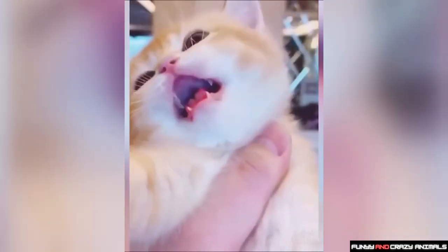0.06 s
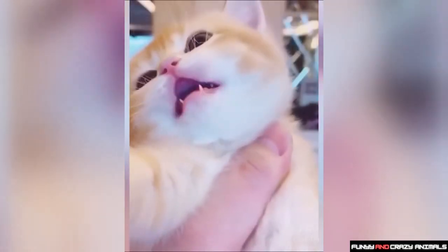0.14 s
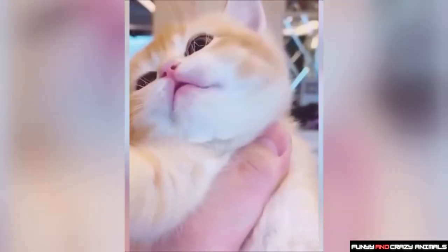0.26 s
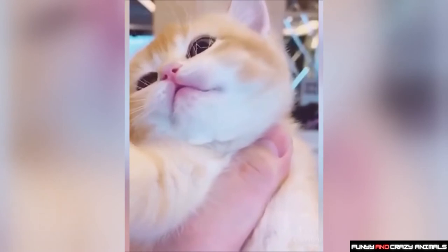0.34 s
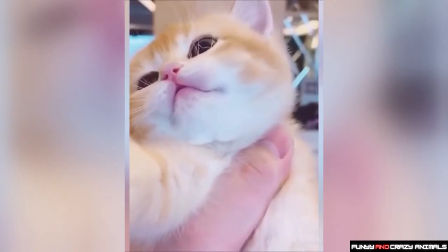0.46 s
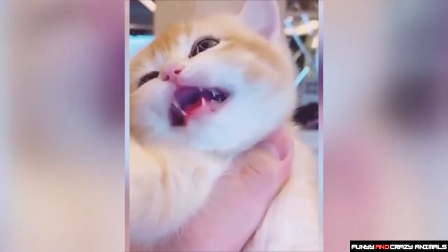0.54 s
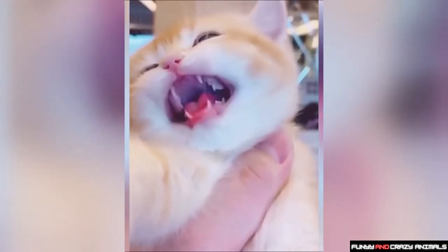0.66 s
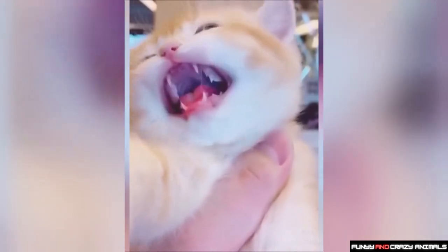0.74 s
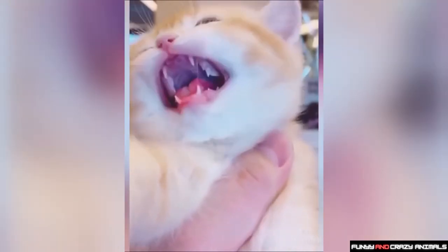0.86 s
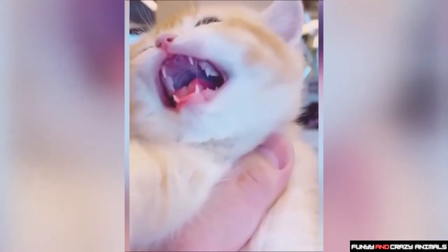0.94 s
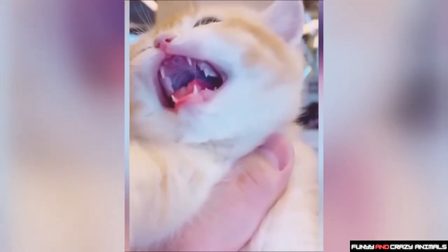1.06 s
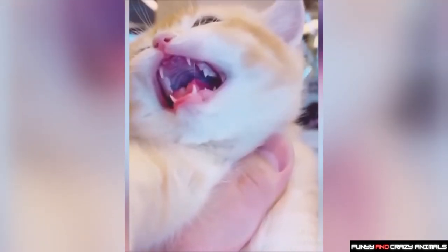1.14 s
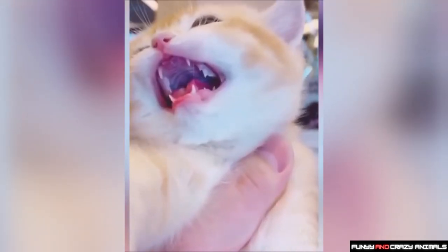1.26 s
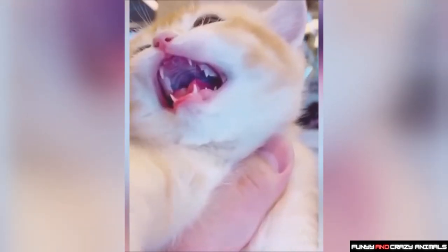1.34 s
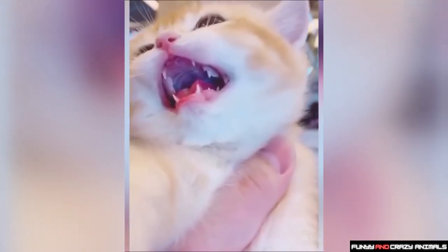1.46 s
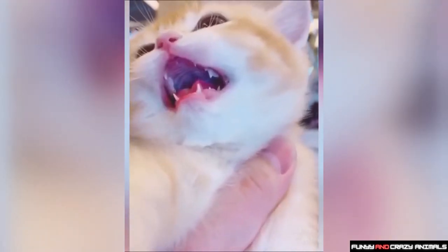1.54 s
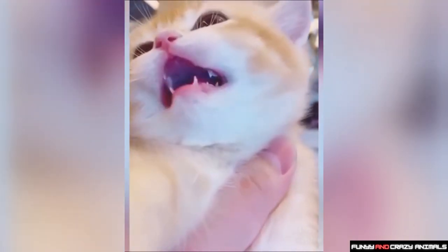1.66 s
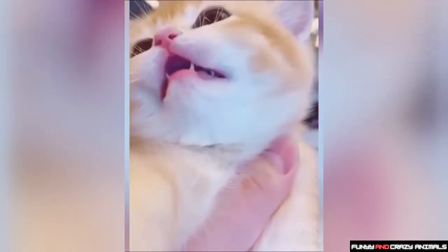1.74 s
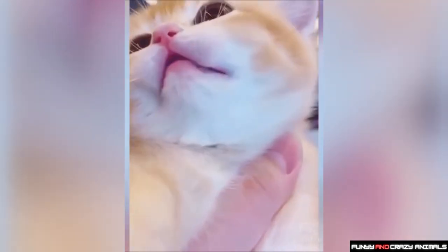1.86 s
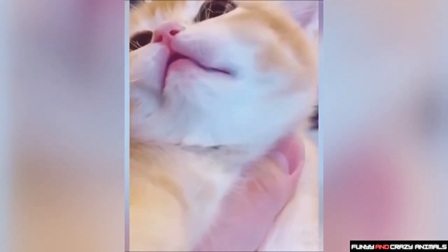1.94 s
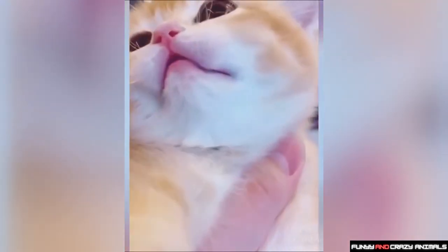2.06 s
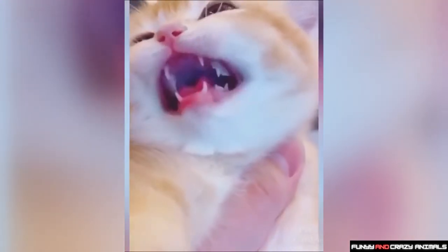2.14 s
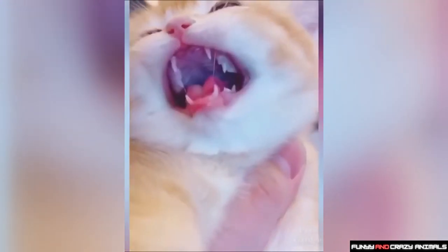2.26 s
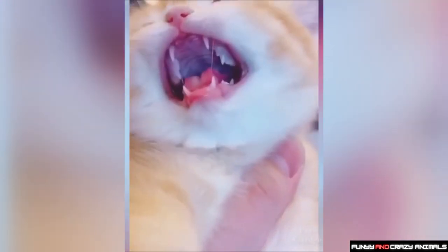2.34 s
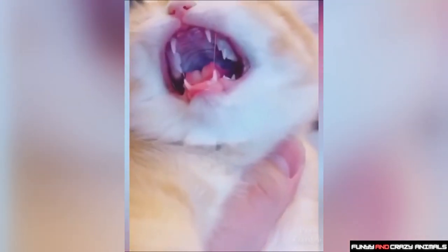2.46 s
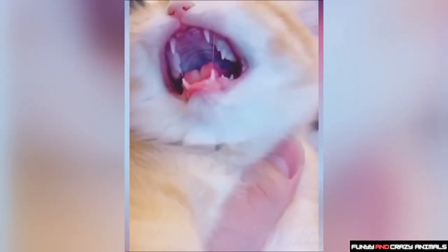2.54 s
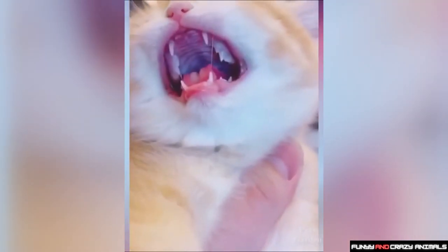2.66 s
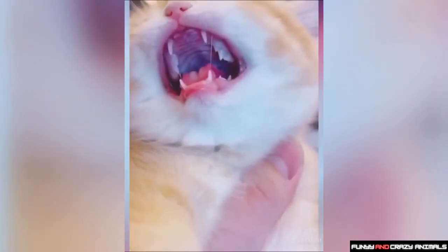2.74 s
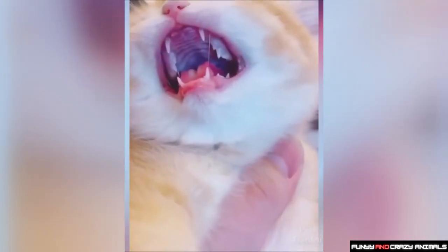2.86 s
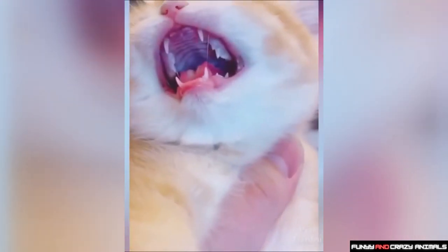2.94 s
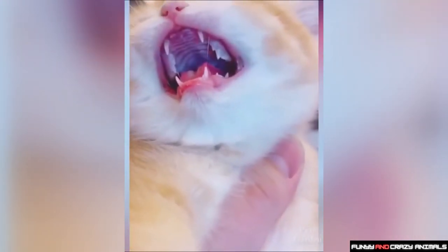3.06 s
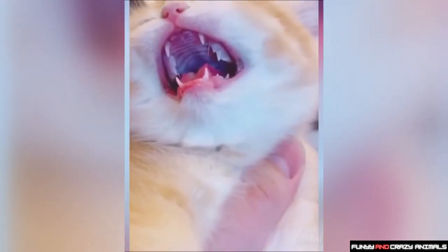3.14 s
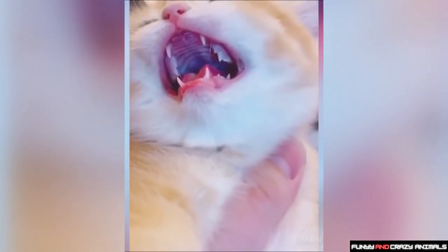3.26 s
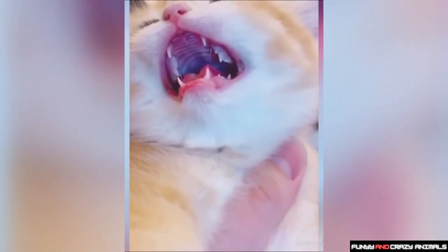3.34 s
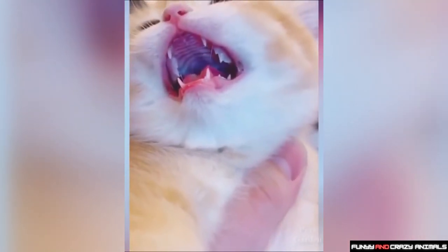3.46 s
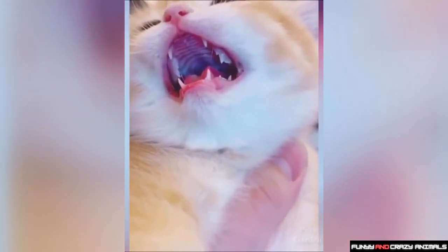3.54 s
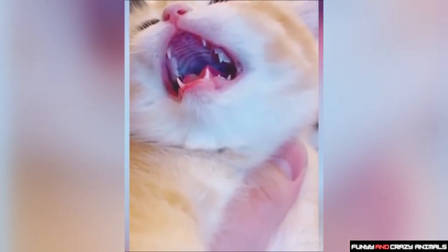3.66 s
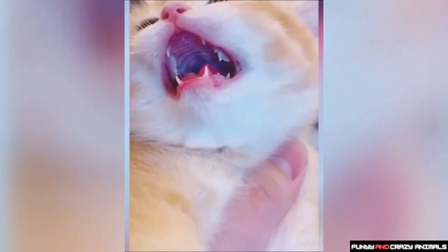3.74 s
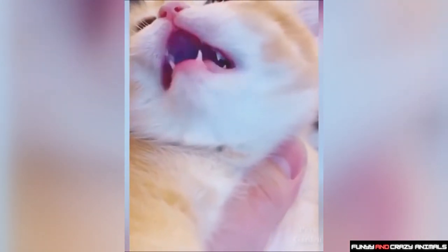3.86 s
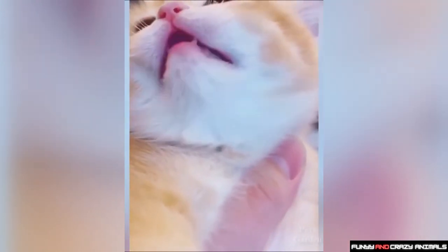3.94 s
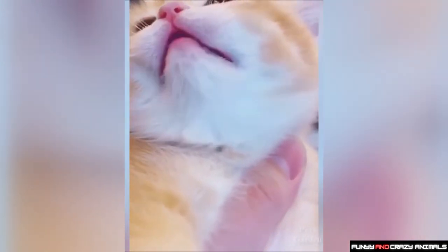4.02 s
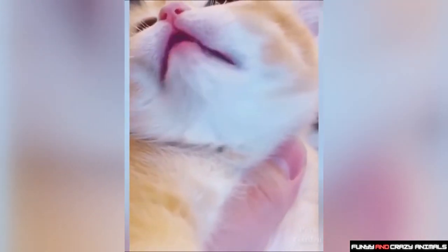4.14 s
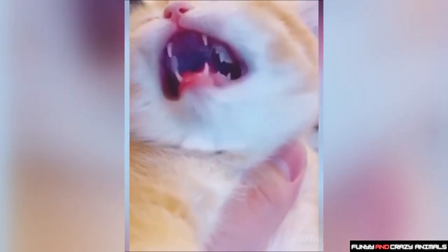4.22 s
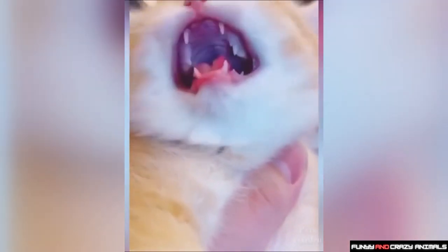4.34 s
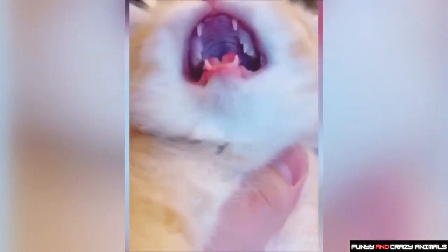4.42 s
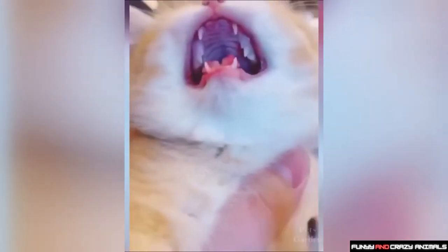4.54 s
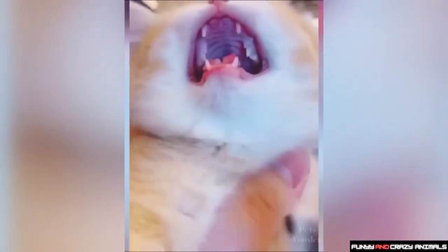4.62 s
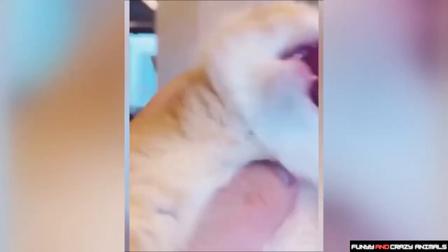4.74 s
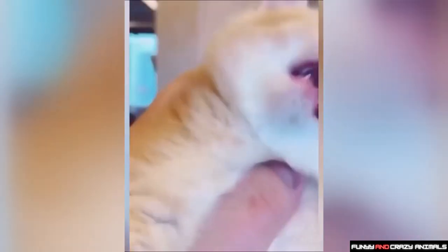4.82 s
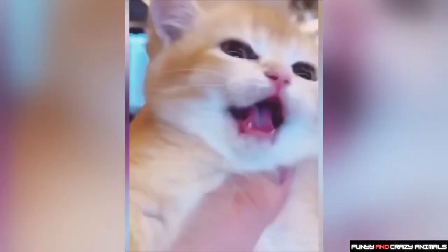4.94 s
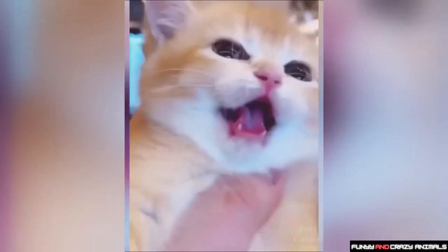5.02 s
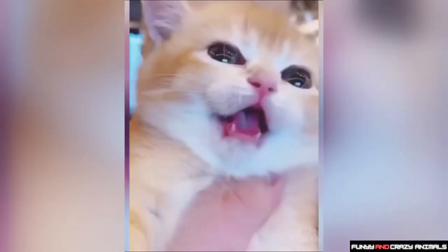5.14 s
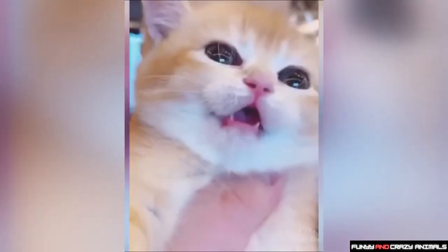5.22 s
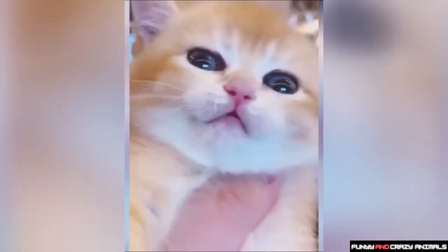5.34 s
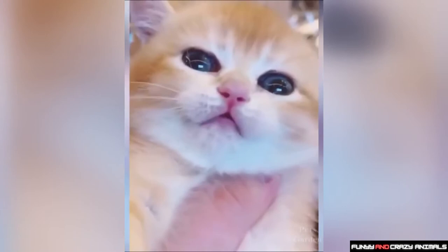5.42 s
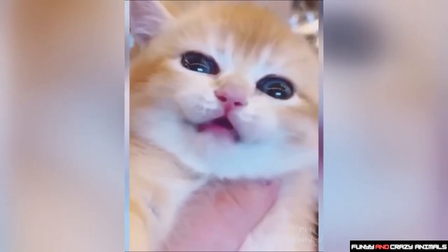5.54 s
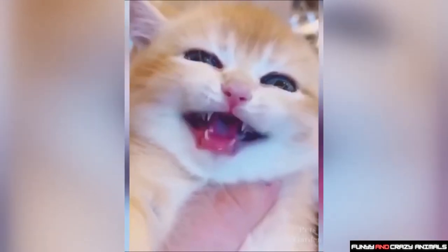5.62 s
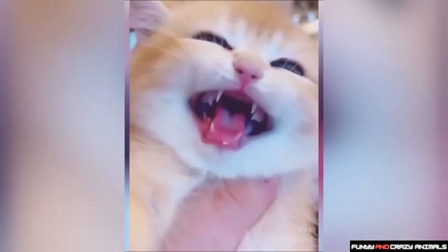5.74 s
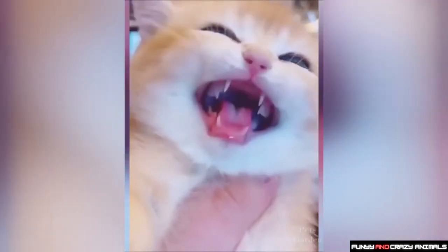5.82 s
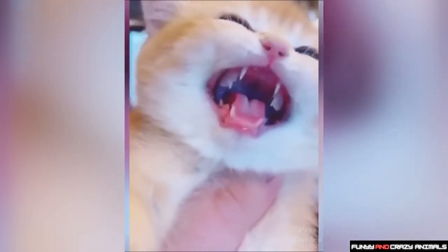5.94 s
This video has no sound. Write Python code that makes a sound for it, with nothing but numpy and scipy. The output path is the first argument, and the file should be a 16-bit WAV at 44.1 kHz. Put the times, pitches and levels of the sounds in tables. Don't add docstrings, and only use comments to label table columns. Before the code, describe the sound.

A kitten meows right at a phone microphone in a small furnished room. The dying end of a call is heard at 0 seconds and shuts with a small pop. After a quiet gap with faint lip parting, a bright, high meow runs from about 0.5 to 1.65, sinking in pitch and ending in a weaker warble and short creak. A light nose puff leads into a long meow from 2.1 to 3.7, hoarse at first, then steady and piercing, slowly falling and closing with a clear pop. After a lip tick, a scream starts around 4.15, rough and doubled, loudest near 4.4 to 4.65 with overloaded grit, then turns into a wavering, duller wail ending with a pop at 5.1. A last breathy, hoarse meow begins softly near 5.5, swells from 5.7 and continues to the end. Faint low rumble and slight hiss lie underneath, with short weak echoes.

```python
import sys
import numpy as np
from scipy import signal
from scipy.io import wavfile
from scipy.ndimage import uniform_filter1d, minimum_filter1d

SR = 44100
rng = np.random.default_rng(int(sys.argv[2]) if len(sys.argv) > 2 else 0)


def store_pcm(level_fs):
    pcm = np.round(np.clip(level_fs, -1, 1) * 32767).astype(np.int16)
    wavfile.write(sys.argv[1], SR, np.atleast_2d(pcm).T)


def invert_db(level):
    return 10 ** (np.asarray(level, dtype=float) / 20)


N = 263718
LEAD = 13230


def evened(x):
    return x / np.sqrt(np.mean(abs(x) ** 2) + 1e-20)


def read(points, hz):
    f, value = np.transpose(points)
    return np.interp(np.log(hz + 1), np.log(f + 1), value)


def along(rows, t):
    s, *columns = np.transpose(rows)
    return [np.interp(t, s, c) for c in columns]


def drift(length, span):
    chance = uniform_filter1d(rng.standard_normal(length), int(span))
    return evened(uniform_filter1d(chance, int(span)))


def patches(rows, t, rest_db, edge_db_per_s):
    start, end, db = np.transpose(rows)[:, :, None]
    outside_s = np.maximum(np.maximum(start - t, t - end), 0)
    return np.maximum((db - edge_db_per_s * outside_s).max(axis=0), rest_db)


# freq_hz, density_db [dB per Hz]
RUMBLE_SPECTRUM = [(25, -11.5), (55, 2.5), (110, -7.5), (190, -9.5), (300, -20), (500, -25), (1000, -34),
                   (3000, -36.5), (7000, -44), (15000, -63.5)]
# start_s, end_s, level_db
RUMBLE_SWELLS = [(.1, .15, -52), (.51, 6, -49), (1.45, 1.58, -45), (4.55, 4.66, -41), (5.1, 5.25, -46)]


def rumble(patchy_db=1.5, side_db=-18):
    frames, hz = N // 256 + 5, np.fft.rfftfreq(1024, 1 / SR)
    a, b, c, d, lumps = rng.standard_normal((frames, 513, 5)).T
    lumps = evened(uniform_filter1d(uniform_filter1d(lumps, size=6, axis=0), size=10, axis=1))
    mid, side = a + 1j * b, invert_db(side_db) * (c + 1j * d)
    z = np.array([mid + side, mid - side])
    z = z * invert_db(read(RUMBLE_SPECTRUM, hz)[:, None] + patchy_db * lumps)
    air = evened(signal.istft(z, nperseg=1024, noverlap=768)[1][:, :N])
    level_db = patches(RUMBLE_SWELLS, np.arange(N) / SR, -62, 90) - 3.5
    return invert_db(level_db) * air


# time_s, effort_db, pitch_hz
EARLIER = [(-.3, -1, 814.2), (-.04, -7, 775.5)]
# time_s, pitch_hz
PITCH = [
    [(0.0, 730), (0.038, 648), (0.06, 643.4)],
    [(0.535, 867), (0.567, 880), (0.587, 834), (0.643, 795), (0.661, 752.7), (0.781, 762.3), (0.949, 734.6),
     (1.168, 685), (1.338, 680)],
    [(1.356, 658.6), (1.456, 663.6), (1.472, 697.4), (1.53, 636), (1.576, 621), (1.59, 676.5), (1.638, 701),
     (1.665, 652)],
    [(2.172, 821), (2.196, 790), (2.26, 794), (2.4, 771.5), (2.9, 774), (3.194, 729), (3.27, 742),
     (3.47, 701.4), (3.708, 682)],
    [(4.23, 839), (4.348, 850), (4.438, 920.6), (4.46, 896), (4.6, 920), (4.62, 897.5)],
    [(4.676, 901.3), (4.738, 947), (4.824, 881), (4.834, 856), (4.856, 852), (4.962, 890), (5.038, 818.3),
     (5.066, 766), (5.1, 738.5)],
    [(5.599, 943), (5.631, 856), (5.68, 856), (5.7, 830), (5.752, 819), (5.968, 802.6)],
]
# start_s, settled_s, start_ratio, dip_ratio [of held pitch]
SCOOPS = [
    (2.062, 2.172, 1.32, .85),
    (4.146, 4.23, 1.15, .886),
    (5.525, 5.599, .9, .82),
]
DIP_AT, QUICK_FALL = .42, .77


def pitch(t):
    held = [(s, hz) for s, db, hz in EARLIER] + sum(PITCH, [])
    for start, settled, top, dip in SCOOPS:
        goal_hz, = along(held, settled)
        fall_s = DIP_AT * (settled - start)
        ratios = [(0, top), (fall_s / 2, top + QUICK_FALL * (dip - top)), (fall_s, dip)]
        held = sorted(held + [(start + s, ratio * goal_hz) for s, ratio in ratios])
    return along(held, t)[0]


# start_s, end_s, air_db [re tone]
HOARSE = [(0, .04, -15), (.645, .66, -12), (1.14, 1.32, -19), (.86, 1.0, -21), (1.475, 1.61, -10),
          (2.08, 2.19, -6), (2.34, 2.44, -13), (3.05, 3.4, -19), (4.27, 4.4, -18), (4.66, 4.7, -15),
          (5.56, 5.66, -6), (5.7, 6, -14)]
CLEAR_DB, CREAK_DB, START_AIR_DB, SETTLE_DB_PER_S = -25, 10, -3, 130


def rasp(t):
    layers = [patches(HOARSE, t, CLEAR_DB, 250)]
    layers.append(patches([(shut, end, CREAK_DB) for start, shut, end, *rest in CALLS], t, CLEAR_DB, 1500))
    for start, *rest in CALLS:
        settling_db = START_AIR_DB - SETTLE_DB_PER_S * np.maximum(t - start, 0)
        layers.append(np.where(t > start - .05, settling_db, CLEAR_DB))
    return np.max(layers, axis=0)


# start_s, end_s, half_pitch_db [re main lines]
DOUBLING = [(.89, .92, -22), (2.33, 2.42, -3), (2.45, 2.64, -22), (2.7, 3.37, -27), (4.28, 4.61, -1),
            (4.69, 4.71, -16), (4.815, 4.855, -1), (4.94, 5.01, -9), (5.7, 6, -15)]


def folds(t, jitter=.0016, shimmer_db=.8):
    hz, half_db, rasp_db = pitch(t), patches(DOUBLING, t, -45, 550), rasp(t)
    rough_jitter = jitter * (1 + 12 * np.minimum(invert_db(rasp_db), 1))
    wobble = rough_jitter * drift(len(t), 150) + .0041 * drift(len(t), 600)
    turn = np.exp(1j * np.pi * np.cumsum(hz * (1 + wobble)) / SR)
    clear = np.clip(1 - .6 * invert_db(rasp_db), 0, 1)
    unsteady_db = np.clip(-.4 * half_db, 1.5, 5)
    line, main, half = np.ones(len(t), complex), 0, 0
    for k in range(1, 23):
        delay = np.exp(.35j * k ** 2)
        line = line * turn
        half = half + min(k / 5, 1) ** 1.5 * (line * delay).real
        line = line * turn
        main = main + clear ** max(k - 5, 0) * (line * delay).real
    half_level = invert_db(half_db + unsteady_db * drift(len(t), 300))
    tone = (main + half_level * half) / np.sqrt(11)
    air = signal.lfilter([1, -1], [1, -.75], rng.standard_normal(len(t)))
    puffs = evened((1 + .6 * (turn ** 2).real) * air)
    return tone * invert_db(shimmer_db * drift(len(t), 150)) + invert_db(rasp_db) * puffs


# time_s, effort_db, mouth_hz, mouth_db, throat_hz
TAIL_END = [(0.0, -20, 3000, 10, 1750), (0.024, -24.5, 3250, -9, 1450), (0.044, -24, 3060, -6, 1352)]
FIRST = [(0.547, -20, 3720, 28, 1950), (0.601, -21.5, 4136, 26, 1648), (0.673, -9, 3750, 25, 2160),
         (0.719, -5.5, 3800, 29, 2150), (0.811, -9.5, 3744, 19, 2200), (0.889, -9, 2970, 10, 2250),
         (1.087, -10, 2870, 11, 2070), (1.169, -13.5, 2710, 2, 1700), (1.405, -15.5, 2700, -10, 1750)]
WARBLE = [(1.47, -15, 2700, 4, 1900), (1.57, -15, 2650, 11, 1700), (1.627, -28, 2395, -15, 1450)]
LONG = [(2.072, -20, 3130, 13, 1800), (2.164, -19, 3810, 28, 1621), (2.248, -15.5, 3698, 21, 1950),
        (2.335, -7.5, 3740, 24, 1900), (2.46, -10.5, 3500, 18, 2500), (2.9, -6.5, 3060, 18, 2100),
        (3.37, -11, 3000, 16, 1850), (3.458, -15.5, 2890, 0, 1620), (3.7, -17, 2817, -15, 1680)]
SCREAM = [(4.154, -20.5, 3530, 20, 1750), (4.224, -19.5, 3950, 24, 1660), (4.27, -15, 4000, 22, 1690),
          (4.29, -7, 3900, 33, 1700), (4.345, -7.5, 4260, 31, 1710), (4.375, -0.5, 3900, 33, 1750),
          (4.6, 1, 4030, 37, 1815), (4.63, -1, 3620, 37, 1810), (4.68, -5.5, 3560, 21, 1800)]
WAIL = [(4.71, -11.5, 2900, 3, 1780), (4.774, -10.5, 2000, 10, 1850), (4.832, -9.5, 2200, 14, 1800),
        (4.88, -10.5, 2650, 12, 1790), (4.97, -12, 3550, 13, 2000), (5.04, -13, 2710, 13, 2000),
        (5.084, -20, 2576, -7, 1900)]
LAST = [(5.535, -39, 3290, -6, 1700), (5.561, -28, 3550, 8, 1850), (5.639, -23.5, 3410, 3, 1720),
        (5.709, -12, 3410, 20, 1850), (5.739, -17, 3630, 14, 2000), (5.877, -9.5, 3400, 15, 2100),
        (5.957, -14, 3450, 14, 1963), (5.98, -10.5, 3170, 22, 1850)]
SILENT_DB = -46
TREBLE_DB, TREBLE_START_DB, TREBLE_START_S, TREBLE_FADE_S = -14.5, 4, .22, .2
TURN_S, TURN_LENGTH_S, TURNED_DB = 4.97, .1, -3.5


def tract(t):
    rows = TAIL_END + FIRST + WARBLE + LONG + SCREAM + WAIL + LAST
    edges = [row[0] for row in CALLS[1:]] + [row[2] for row in CALLS[:-1]]
    rows = sorted(rows + [(s, SILENT_DB, *along(rows, s)[1:]) for s in edges])
    effort_db, mouth_hz, mouth_db, throat_hz = along(rows, t)
    push_db = np.clip(effort_db + 10, -14, 12)
    throat_db = 9 - 26 * (throat_hz - 1800) / 1000
    chest_points, fade_points = [], []
    for start, shut, end, chest, left_db in CALLS:
        chest_points += [(start, chest), (end, chest)]
        fade_points += [(start, TREBLE_START_DB), (start + TREBLE_START_S, 0)]
        fade_points += [(shut - TREBLE_FADE_S, 0), (shut - .04, left_db), (end, left_db)]
    chest_db, = along(chest_points, t)
    fade_db, = along(fade_points, t)
    bright_db = TREBLE_DB - .7 * push_db + 1.45 * np.maximum(push_db - 3, 0) + fade_db
    bright_db = bright_db + TURNED_DB * np.clip((t - TURN_S) / TURN_LENGTH_S, 0, 1)
    return effort_db, mouth_hz, mouth_db, throat_hz, throat_db, np.minimum(chest_db - effort_db, 6), bright_db


# freq_hz, gain_db
HEAD = [(1000, 0), (2000, 2), (3500, 0), (4300, -5), (4900, -13), (5600, -10), (6500, -7), (8000, -16),
        (9800, -26), (11000, -14), (12700, -12), (13400, -28), (15400, -33)]


def throat(x, t0, mouth_width_hz=480, throat_width_hz=700, hiss_db=-13.5):
    hz, t, z = signal.stft(x, SR, nperseg=512, noverlap=384)
    effort_db, mouth_hz, mouth_db, throat_hz, throat_db, chest_db, bright_db = tract(t + t0)
    f = hz[:, None]
    shape = invert_db(read(HEAD, f))
    shape = shape * (1 + invert_db(mouth_db) / (1 + (2 * (f - mouth_hz) / mouth_width_hz) ** 2) ** 1.24)
    shape = shape * (1 + invert_db(throat_db) / (1 + (2 * (f - throat_hz) / throat_width_hz) ** 2))
    air = rng.standard_normal(z.shape) + 1j * rng.standard_normal(z.shape)
    hiss = invert_db(hiss_db) * (f > 5400) * air * np.sqrt(np.mean(abs(z) ** 2))
    z = (z + hiss) * shape
    z = z * np.minimum(f / 640, 1) ** 3.5
    chest, treble = f < 1080, f > 5200
    lift_db = 0
    for band, db in [(chest, chest_db), (treble, bright_db), (~chest & ~treble, 0)]:
        band_db = 10 * np.log10(np.sum(abs(z * band) ** 2, axis=0) + 1e-12)
        lift_db = lift_db + band * (db - band_db)
    lift_db = uniform_filter1d(uniform_filter1d(lift_db, size=5, axis=1), size=5, axis=0)
    return evened(signal.istft(z * invert_db(lift_db), SR, nperseg=512, noverlap=384)[1][:len(x)])


# start_s, mouth_shut_s, end_s, chest_db, end_treble_db
CALLS = [
    (-1, .05, .06, -38, -11),
    (.535, 1.63, 1.665, -36, -1),
    (2.062, 3.705, 3.74, -33, -4),
    (4.146, 5.086, 5.1, -33, -7),
    (5.525, 6.1, 6.2, -30, 0),
]


def meows():
    t = (np.arange(N + LEAD) - LEAD) / SR
    before_db = along(EARLIER + [row[:3] for row in TAIL_END], t)[0]
    effort_db = np.where(t < 0, before_db, tract(t)[0])
    effort_db = effort_db + .7 * np.clip(-effort_db / 8, 0, 1) * drift(len(t), 1200)
    level = invert_db(np.minimum(effort_db, -3))
    sounding = sum((t > start) & (t < end) for start, shut, end, *rest in CALLS)
    gate = uniform_filter1d(1. * (sounding > 0), size=200)
    return level * gate * throat(folds(t), t[0])


# start_s, peak_db [envelope tops out 11 dB lower], ring_hz, length_ms,
# noise_share [0-1]
SMACKS = [
    (.056, -27.5, 796, 3.8, 0.3),
    (.492, -57.5, 3376, 2.6, 1),
    (.503, -46.5, 1800, 14, 0.3),
    (1.632, -21, 800, 9, .2),
    (2.047, -48.5, 3500, 7.7, .8),
    (3.709, -8, 816, 3.9, 0),
    (4.123, -38, 6500, 2.5, 1),
    (5.084, -7, 766, 3.5, 0),
]


def smacks():
    out, t = np.zeros(N + LEAD), np.arange(2000) / SR
    for start_s, peak_db, ring_hz, length_ms, noise_share in SMACKS:
        noise = 1 + noise_share * 6.6 * drift(len(t), 5)
        envelope = (t * 680 / length_ms) * np.exp(1 - t * 2400 / length_ms)
        at = LEAD + round(start_s * SR)
        out[at:at + len(t)] += invert_db(peak_db) * noise * np.sin(2 * np.pi * ring_hz * t) * envelope
    return out


# freq_hz, t60_s
ROOM = [(500, 0.12), (1320, 0.3), (3480, 0.32)]


def room(x):
    taps = np.zeros((2, SR // 2))
    at = np.arange(240, SR // 2 - 20, 20) + rng.integers(0, 20, (SR // 2 - 241) // 20)
    taps[0, at], taps[1, at] = rng.choice([-1., 1.], (2, len(at)))
    taps[1] = taps[0] + .1 * taps[1]
    hz, t, z = signal.stft(taps, SR, nperseg=256)
    f = hz[:, None]
    decay_db = -60 * t / read(ROOM, f) - .5 * f / 1000
    tail = signal.istft(z * invert_db(decay_db), SR, nperseg=256)[1]
    return signal.fftconvolve(x[None], tail / np.linalg.norm(tail[0]), axes=1)[:, :len(x)]


# freq_hz, side_db [re mid]
APART = [(300, -12), (700, -40), (2000, -33.5), (5000, -27), (7000, -14), (9000, -5.5), (13000, -3)]
TILT_DB = -.6


def spread(x):
    hz, t, z = signal.stft(x, SR, nperseg=512)
    chance = rng.standard_normal(z.shape) + 1j * rng.standard_normal(z.shape)
    chance = evened(uniform_filter1d(uniform_filter1d(chance, size=8, axis=0), size=8, axis=1))
    side = chance * invert_db(read(APART, hz))[:, None]
    pair = np.array([z * (invert_db(TILT_DB / 2) + side), z * (invert_db(-TILT_DB / 2) - side)])
    return signal.istft(pair / np.sqrt(1 + abs(side) ** 2), SR, nperseg=512)[1][:, :len(x)]


def scene():
    kitten = meows() + smacks()
    return (spread(kitten) + invert_db(-13.5) * room(kitten))[:, LEAD:] + rumble()


def thinned(x, mask_db=-47, patchy_db=4, valley_db=-40):
    hz, t, z = signal.stft(x, SR, nperseg=1024, noverlap=768)
    f = hz[:, None]
    power = np.mean(abs(z) ** 2, axis=0) + 1e-14
    total = power.sum(0)
    band = np.minimum(np.arange(513) // 16, 31)
    block = np.arange(len(t)) // 8
    luck = rng.standard_normal((len(t) // 4 + 1, 32, 2))[block][:, band].T
    band_db = 10 * np.log10(uniform_filter1d(power, size=16, axis=0)[16 * band + 8] / total)
    weak_band = (band_db + 5 * luck[0] < mask_db) & (f > 6900) & (f < 13100) & (total > 1e-4)
    re_peak_db = 10 * np.log10(power * minimum_filter1d(1 / power, size=41, axis=0))
    depth_db = np.where(f > 13100, -9, valley_db)
    valley = (re_peak_db + 7 * luck[1] < depth_db) & (f > 250)
    treble = np.clip((f - 4000) / 5000, 0, 1)
    keep = np.where(weak_band | valley, .03, invert_db(patchy_db * treble * luck[1]))
    return signal.istft(z * keep, SR, nperseg=1024, noverlap=768)[1][:, :N]


def top_cut(x):
    return signal.sosfilt(signal.butter(12, 15590, fs=SR, output="sos"), x)


def record(dry):
    squashed = dry ** 2 * np.minimum(abs(dry), 1)
    bend = signal.lfilter([1, -2, 1], [1, -1.94, .9409], squashed)
    bent = dry + .16 * bend
    limited = bent / (1 + abs(bent / 1.05) ** 8) ** (1 / 8)
    edge = signal.firwin(255, 15600, fs=SR)
    mix = signal.oaconvolve(thinned(limited), edge[None], "same")
    return top_cut(np.clip(mix, -1, 1))


dry = scene()
out = record(dry)
store_pcm(out)
```